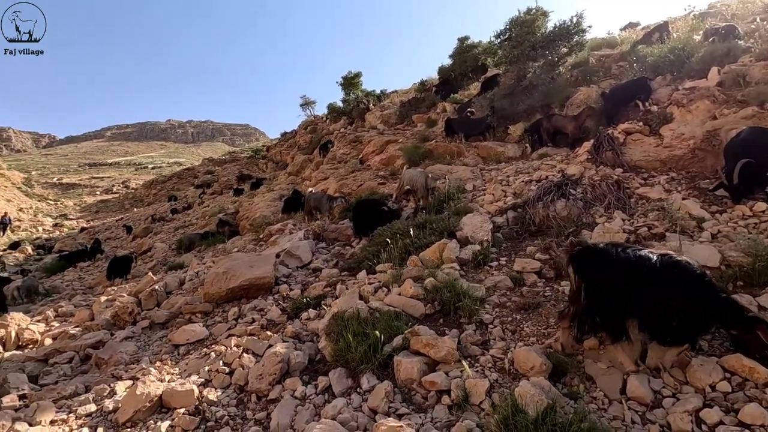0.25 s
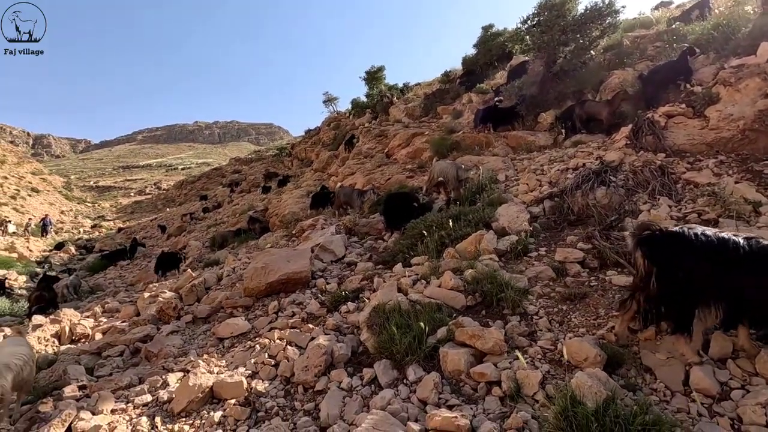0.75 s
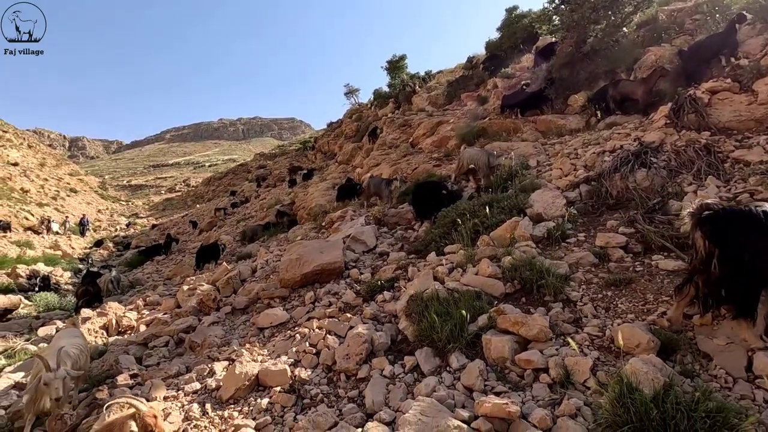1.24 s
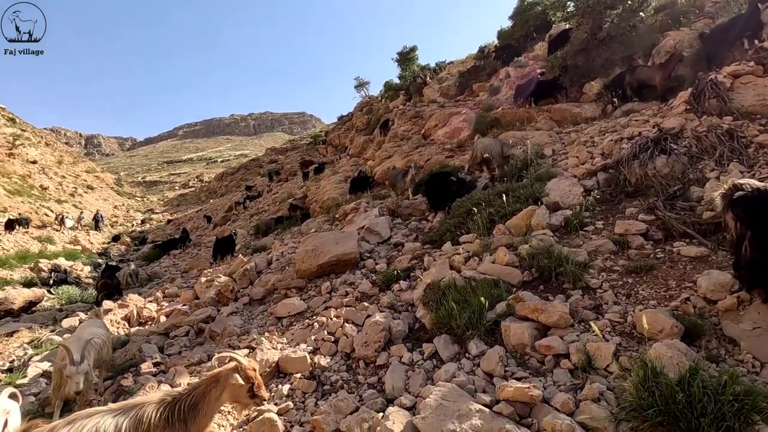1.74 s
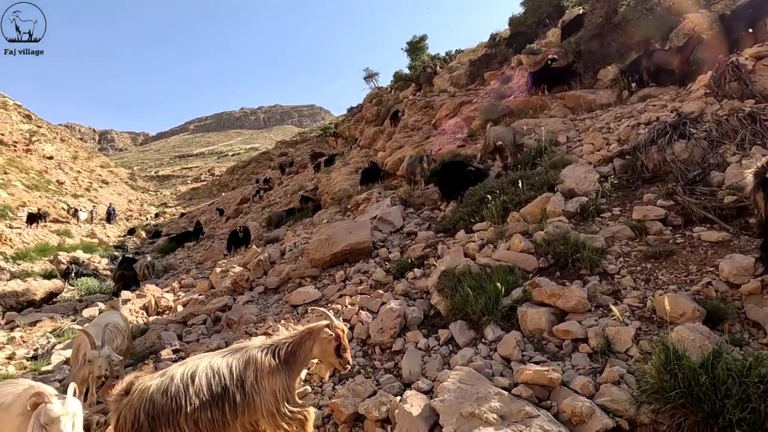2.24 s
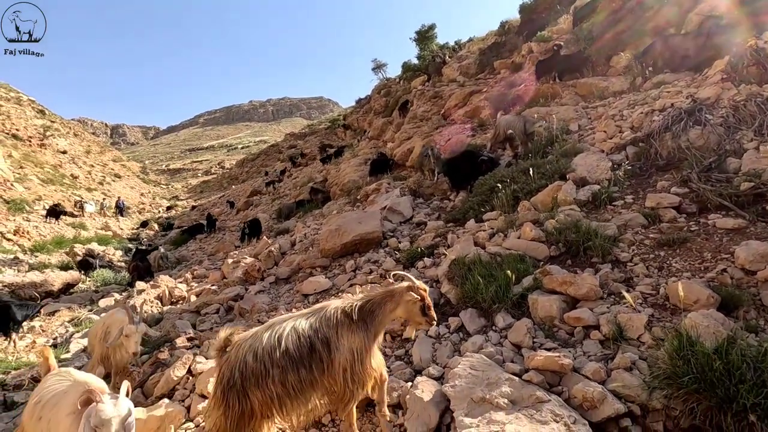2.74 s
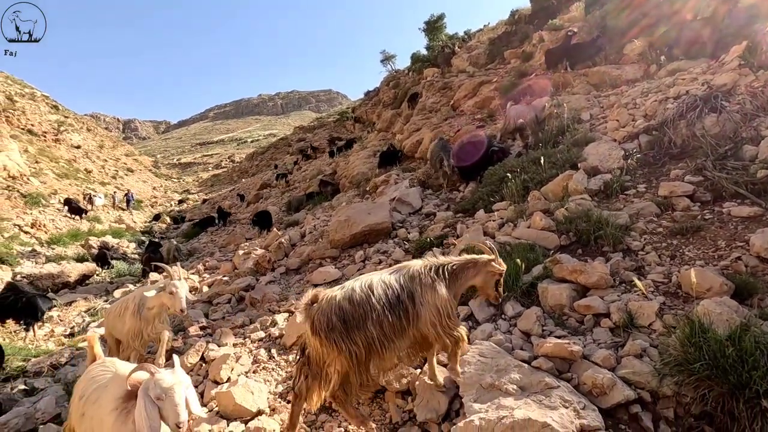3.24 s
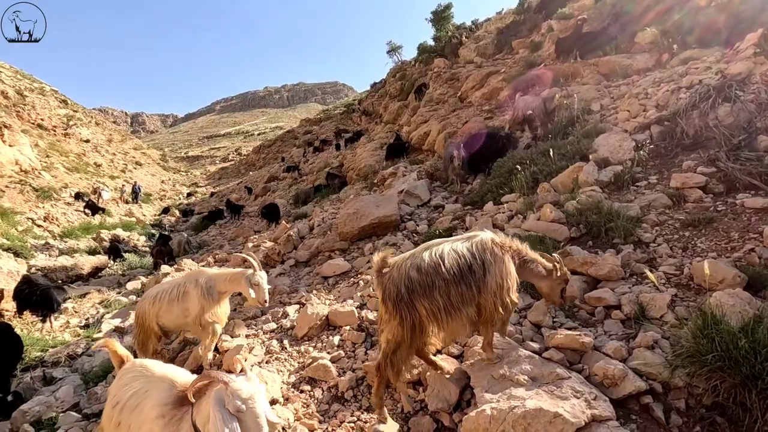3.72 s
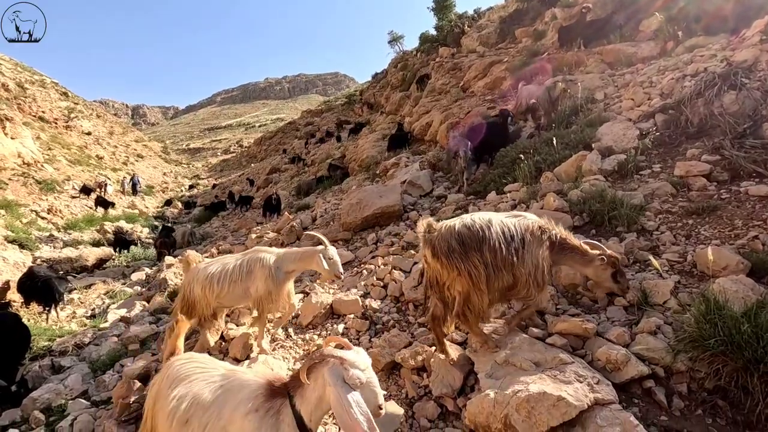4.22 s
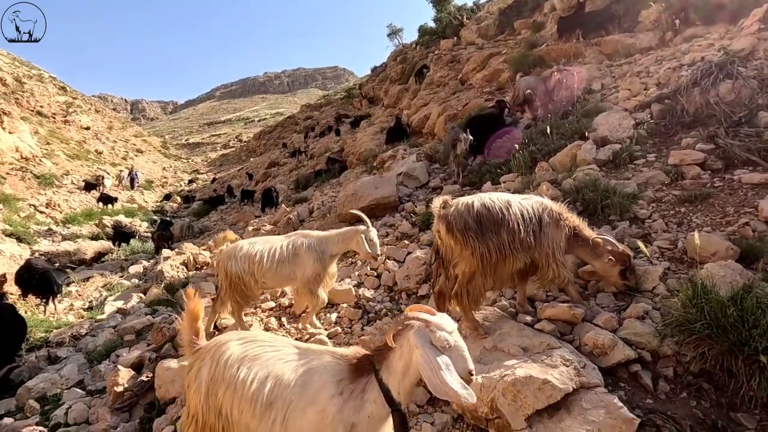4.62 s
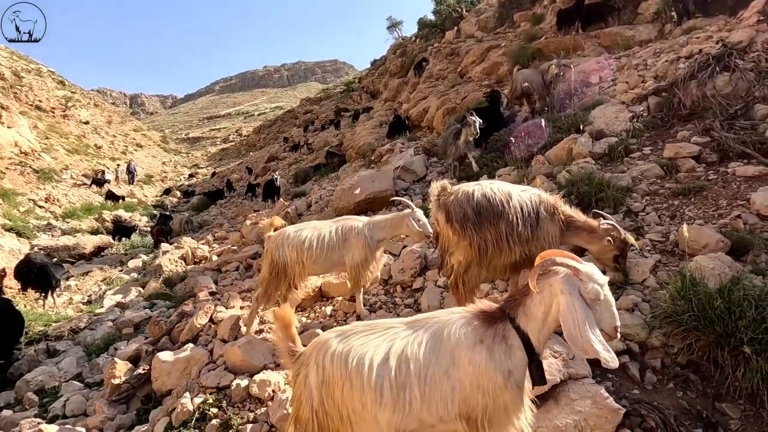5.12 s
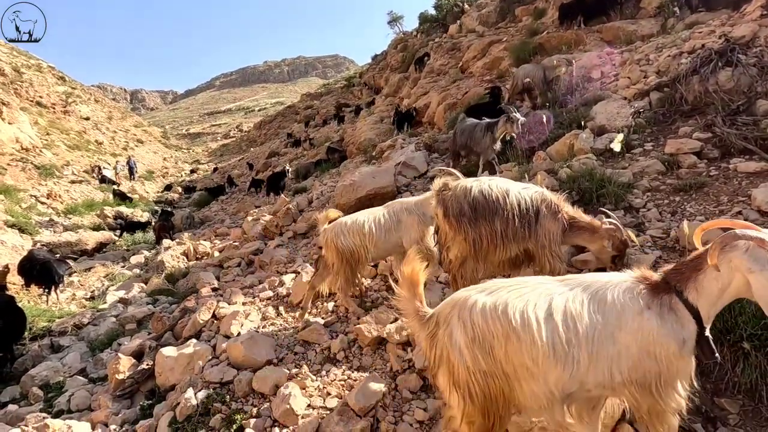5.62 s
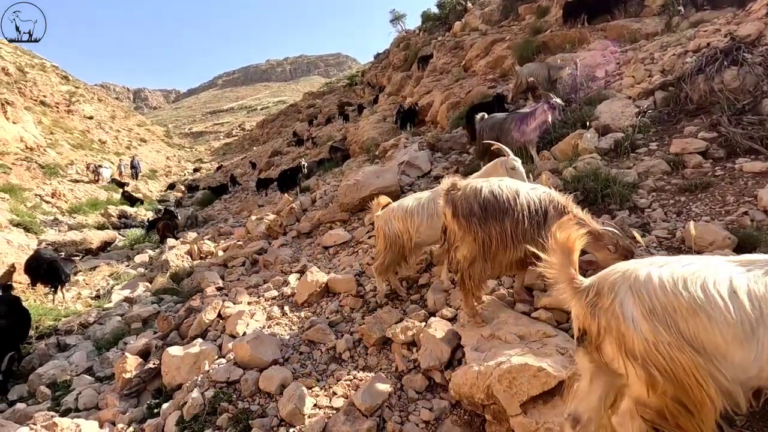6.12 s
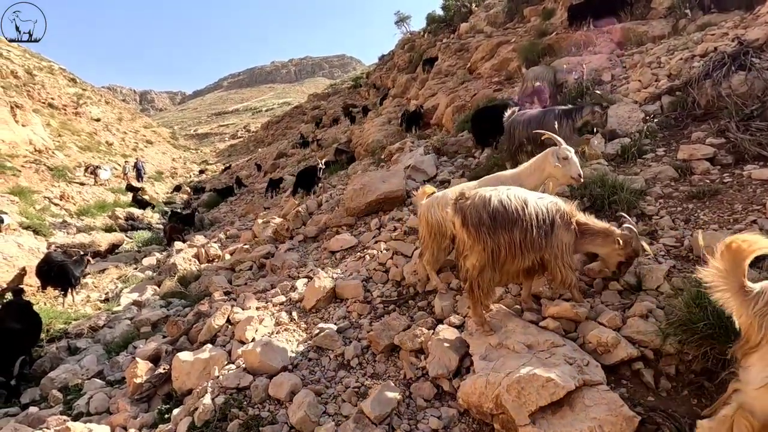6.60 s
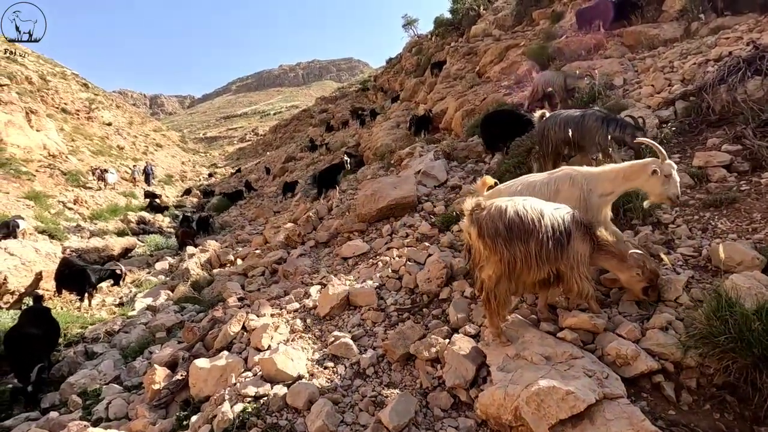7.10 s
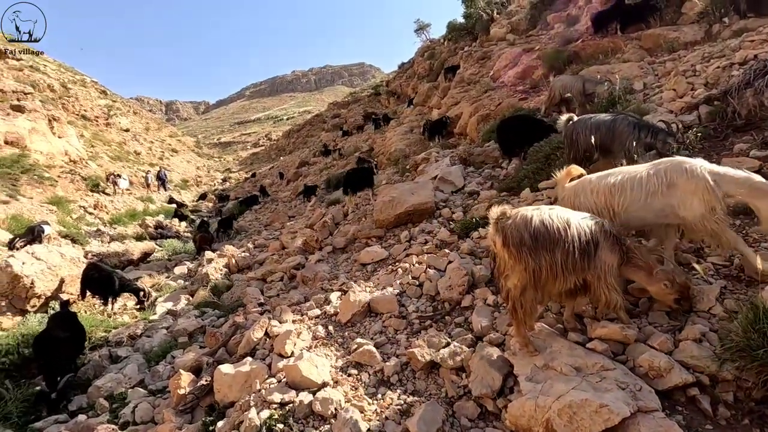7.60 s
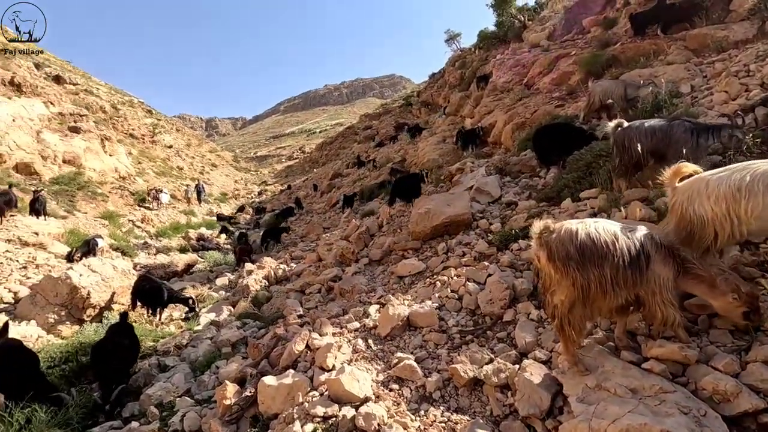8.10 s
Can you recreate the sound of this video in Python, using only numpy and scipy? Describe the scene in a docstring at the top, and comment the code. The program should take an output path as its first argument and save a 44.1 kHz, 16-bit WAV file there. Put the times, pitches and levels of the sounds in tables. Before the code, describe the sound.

Outdoors on a stony hillside, a goat's small metal bell is heard from the start, quiet and loosely spaced, with a very faint far bleat at 0.3 s and light stone clicks. Around 1 s a short low puff of wind thumps the microphone, stronger on the right. From 1.2 to 3 s the bell's clinks quicken and grow; a hollow stone knock lands at 2.1 s. From 3.5 s the bell is close, bright and ringing, irregular touches several times a second, drifting rightward. Low brief grunts come at 3.2, 5.5 and, most clearly, 6.3 s. Hooves knock stones and grind gravel throughout, with a crisp gritty scuff at 6 s. The bell has a rounder hum around 7 s; a distant wavering bleat comes at 7.7 s, then stone knocks and scuffs near 7.9 s. Clinking continues to the end at 8.35 s, with faint short rock echoes.

```python
"""A goat's small metal bell clinks as the animal walks past over loose stones on a hillside:
decaying modes, reset by each clapper touch. Hooves knock stones (struck noise bands) and grind
gravel (coloured noise grains). Goats grunt low and one bleats far off (harmonic stacks); a puff
of wind hits the microphone ports early on (low noise and pressure pulses). Rocks echo the near sounds.
"""
import sys
import numpy as np
from scipy import signal
from scipy.fft import rfft, irfft
from scipy.io import wavfile
from scipy.ndimage import uniform_filter1d

SR = 44100
rng = np.random.default_rng(int(sys.argv[2]) if len(sys.argv) > 2 else 0)


def persist_wave(psi):
    """Save psi, clipped to +-1, as 16-bit WAV."""
    counts = np.round(np.clip(psi, -1, 1) * 32767).astype(np.int16)
    wavfile.write(sys.argv[1], SR, np.atleast_2d(counts).T)


N = 368235


def gain_of(db):
    """Decibels to gain."""
    return 10 ** (np.asarray(db) / 20)


def evened(x):
    """Scales to rms 1."""
    return x / np.sqrt(np.mean(x ** 2) + 1e-20)


def read(points, hz, column=1):
    """A table column, interpolated on a log-frequency axis."""
    table = np.transpose(points)
    return np.interp(np.log(hz + 1), np.log(table[0] + 1), table[column])


def curve(rows, column=1):
    """A table column, interpolated at every sample."""
    table = np.transpose(rows)
    return np.interp(np.arange(N) / SR, table[0], table[column])


def held(rows):
    """For every sample, the index of the last event and the seconds since it."""
    start_s, t = np.transpose(rows)[0], np.arange(N) / SR
    last = np.maximum(np.searchsorted(start_s, t) - 1, 0)
    return last, t - start_s[last]


def add(mix, start_s, sound):
    """Mixes a sound in at start_s."""
    part = mix[:, round(start_s * SR):][:, :sound.shape[-1]]
    part += sound[..., :part.shape[-1]]


def drift(top_hz):
    """Slow random wander of rms 1: 16 sines over the decade below top_hz."""
    t = np.arange(N // 64 + 2) * 64 / SR
    slow = 0
    for f in np.geomspace(top_hz / 10, top_hz, 16):
        slow = slow + np.sin(2 * np.pi * (f * t + rng.random())) / np.sqrt(f)
    return np.interp(np.arange(N) / SR, t, evened(slow - slow.mean()))


def band(x, lo_hz, hi_hz):
    """Band-pass."""
    return signal.sosfilt(signal.butter(2, [lo_hz, hi_hz], "bandpass", fs=SR, output="sos"), x)


# left-right likeness of the ground noise: f/Hz, likeness/1
LIKENESS = [(60, 0.83), (180, 0.9), (540, 0.75), (1640, 0.7), (4940, 0.73), (14900, 1)]


def coloured(x, shape):
    """Gives two channels a spectrum and a partial likeness, rms 1."""
    hz = np.fft.rfftfreq(N, 1 / SR)
    a, b = rfft(x) * gain_of(read(shape, hz))
    same = np.clip(read(LIKENESS, hz), -1, 1)
    return evened(irfft([a, same * a + np.sqrt(1 - same ** 2) * b], N))


# slow pressure lumps: t/s, level/dB
WIND_LEVEL = [(0.0, -56), (0.23, -65.5), (1.0, -36.5), (1.39, -54.5), (1.46, -41.5), (1.53, -53.5),
              (3.16, -76), (3.46, -51.5), (3.56, -62), (5.86, -67.5), (6.05, -63), (6.6, -68), (7.91, -52),
              (8.02, -65), (8.35, -49)]
# faster buffeting of one gust, before gust_db: t/s, level/dB
GUST_LEVEL = [(0.4, -96), (0.964, -39), (1.546, -62.5), (1.6, -83)]
# sharpest pushes of the gust, before the port tilt: t/s, peak/dB, half-width/s
PUSHES = [(0.943, -29, 0.0032), (0.981, -23.5, .003), (0.994, -26, 0.0028), (1.019, -27, 0.0017)]


def wind(lumps_db=1.5, right_db=5.0, gust_db=-6.0):
    """Slow pressure lumps on both ports, stronger on the right, and one gust with sharp pushes."""
    t = np.arange(N) / SR
    a, b, c = rng.standard_normal((3, N))
    ports = np.array([a + 0.35 * b, a - 0.24 * b])
    lumps = evened(band(band(ports, 6.5, 32.5), 5.2, 140.0)) * gain_of(curve(WIND_LEVEL))
    blowing = (t > GUST_LEVEL[0][0]) * (t < GUST_LEVEL[-1][0])
    gust = evened(band(c, 75.0, 136.0)) * gain_of(curve(GUST_LEVEL) + gust_db) * blowing
    pushes = 0
    for s, db, half_width_s in PUSHES:
        u2 = ((t - s) / half_width_s) ** 2 / 2
        pushes = pushes + gain_of(db) * (1 - u2) * np.exp(-u2)
    mix = (lumps + gust) * gain_of(lumps_db * drift(25.)) + pushes
    return mix * gain_of([[-right_db / 2], [right_db / 2]])


def voices(calls, tone_db, order, rough_db):
    """Short harmonic calls of uneven level; a call's pitch column follows harmonic number order."""
    out = np.zeros((2, N))
    for rows in calls:
        s, hz, db = np.transpose(rows)
        t = np.arange(s[0], s[-1], 1 / SR)
        phase = 2 * np.pi * np.cumsum(np.interp(t, s, hz) / order) / SR
        stack = sum(gain_of(d) * np.sin((k + 1) * phase) for k, d in enumerate(tone_db))
        level = np.sqrt(2) * gain_of(np.interp(t, s, db))
        roughness = gain_of(rough_db * drift(61.0)[:len(t)])
        add(out, s[0], level * stack * roughness * signal.windows.tukey(len(t), .3))
    return out


# one table a far bleat: t/s, f of 2nd harmonic/Hz, level/dB
BLEAT_TRACKS = [
    [(0.28, 640, -78), (0.298, 606, -57), (0.346, 562, -75), (0.376, 587.6, -87), (0.4, 570, -91)],
    [(7.69, 603, -67), (7.732, 590, -47.5), (7.758, 575, -66), (7.796, 630.1, -52), (7.95, 627, -57)],
]
# per harmonic: relative level/dB
BLEAT_HARMONICS = [-54, -4.5, -13, -17]


def bleats():
    """Far bleats: voiced harmonics, the second strongest, on a wavering pitch."""
    return voices(BLEAT_TRACKS, BLEAT_HARMONICS, order=2, rough_db=1.0)


# low grunts: t/s, length/s, first f/Hz, mid level before the port tilt/dB
GRUNT_CALLS = [(3.162, 0.16, 110, -49.5), (5.514, .14, 113.8, -53.5), (6.345, 0.14, 103.7, -43)]
# per harmonic: relative level/dB
GRUNT_HARMONICS = [0, -9.5, -28, -25]


def grunts(sag_hz_per_s=175, ends_db=-7, right_db=3.0):
    """Low voiced harmonics; pitch sags steadily while the level arches, stronger on the right."""
    u = np.linspace(0, 1, 9)
    calls = []
    for s, length_s, hz, db in GRUNT_CALLS:
        arch_db = db + ends_db * (2 * u - 1) ** 2
        calls.append(np.transpose([s + u * length_s, hz - sag_hz_per_s * u * length_s, arch_db]))
    tilt = gain_of([[-right_db / 2], [right_db / 2]])
    return voices(calls, GRUNT_HARMONICS, order=1, rough_db=2.5) * tilt


# ground noise, before grit_db and earth_db: t/s, grit level/dB, earthy scrape level/dB
SHUFFLE_LEVEL = [(0.0, -66.5, -70.5), (2.93, -62.5, -64.5), (3.28, -59.5, -56), (3.58, -63, -74),
                 (3.81, -58.5, -65), (5.95, -58.5, -62.5), (7.42, -64, -67.5), (7.95, -59.5, -64),
                 (8.07, -58.5, -71), (8.35, -60, -66.5)]
# hooves dragging through gravel: t/s, length/s, added grit level/dB
SCUFF_EVENTS = [(3.165, 0.15, -53), (4.028, 0.05, -48), (5.673, 0.037, -56), (5.987, 0.021, -34.5),
                (6.083, 0.061, -45.5), (6.323, .12, -59.5), (7.474, 0.069, -47), (7.895, 0.1, -45.5)]
# gravel spectrum: f/Hz, relative level/dB
GRIT_SHAPE = [(600, 0), (1600, 11), (3400, 3.5), (5700, 6.5), (7400, 10.5), (9000, -24), (12400, -50),
              (15300, -61)]
# earth spectrum: f/Hz, relative level/dB
EARTH_SHAPE = [(90, -5), (130, 3.5), (180, 8), (400, -2), (900, -15), (1500, -23.5)]


def shuffle(grains_per_s=600, spread_db=4.5, hiss=0.16, grit_db=4.5, earth_db=3.5):
    """The herd's many small steps: gravel grains in three bands over a far hiss, scuffs, an earthy scrape."""
    grit = 0
    for lo_hz, hi_hz in [(300, 2200), (2200, 4500), (4500, 15000)]:
        size = gain_of(spread_db * np.minimum(rng.exponential(1, N), 4))
        hits = size * (rng.random(N) < grains_per_s / SR)
        grains = signal.oaconvolve(hits, np.exp(-np.arange(600) / 190.0))[:N]
        patches = gain_of(1.5 * drift(15.))
        grit = grit + band((hiss + evened(grains)) * patches * rng.standard_normal((2, N)), lo_hz, hi_hz)
    level = gain_of(curve(SHUFFLE_LEVEL) + grit_db)[None]
    for s, length_s, db in SCUFF_EVENTS:
        add(level, s, gain_of(db) * signal.windows.tukey(round(length_s * SR), .6))
    earth = coloured(rng.standard_normal((2, N)) * gain_of(5.5 * drift(30.)), EARTH_SHAPE)
    earth_level = gain_of(curve(SHUFFLE_LEVEL, column=2) + earth_db)
    return coloured(grit, GRIT_SHAPE) * level + earth * earth_level


# stones knocked by hooves, levels before peak_db: t/s, knock/dB, knock f/Hz, ground thump/dB, grit/dB
STONE_HITS = [(0.2454, -41, 2330, -71, -48), (0.2505, -49, 2240, -73.5, -60),
              (0.277, -50, 1520, -65, -35.5), (0.4228, -44, 2100, -77, -63), (0.821, -48.5, 3200, -67, -40),
              (1.4272, -57, 2120, -59, -45), (1.6227, -73, 1840, -58, -67), (1.676, -52, 1750, -61, -60),
              (1.717, -43.5, 3160, -60.5, -32), (1.834, -45, 3120, -67, -41), (1.98, -53, 2000, -61, -66),
              (2.0844, -31.5, 1037, -42, -61), (2.2284, -56, 2240, -70, -36.5),
              (2.437, -67, 1860, -49, -44), (3.0898, -37.5, 3220, -59, -39),
              (3.8516, -43.5, 2980, -67, -47), (4.0164, -53, 3200, -81, -46),
              (4.451, -45.5, 1890, -61, -44), (4.805, -44, 2800, -55, -60), (4.8723, -57.5, 940, -55, -34),
              (5.149, -52.5, 2220, -72, -41), (5.3528, -41, 1740, -49, -38), (5.455, -44.5, 930, -59, -60),
              (5.475, -49, 1920, -47, -44), (5.8677, -49, 1690, -67, -55), (5.9555, -58, 1570, -60, -38),
              (5.997, -40, 1730, -52, -25), (6.1258, -41, 2500, -51, -26.5), (6.1694, -47, 2810, -62, -43),
              (6.9604, -39, 1380, -54.5, -62), (7.0752, -40, 1450, -53.5, -48),
              (7.6659, -54, 1610, -48.5, -50), (7.9319, -48, 2880, -50, -45), (7.9675, -39, 1010, -40, -42),
              (8.112, -48, 2300, -69, -42)]
# the goat's way past: t/s, side/1 (0 left, 1 right, beyond 1 further right)
SIDE = [(0, 0.), (1, 0.), (3, 0.12), (5, 1.16), (6.3, 1.25), (7.3, 1.47), (8.35, 0.48)]


def stones(knock_s=0.0055, thump_s=0.012, grit_s=0.0087, tail_db=-18, tail_s=0.025, snap=14.7,
           width=0.14, overtone=1.62, overtone_db=-7.5, thump_hz=495, peak_db=8.5):
    """A short knock at the stone's two pitches, a thump of the ground, a spit of grit, and a noise tail."""
    out, t = np.zeros(N)[None], np.arange(4000) / SR
    for s, knock_db, knock_hz, thump_db, grit_db in STONE_HITS:
        lo_hz, hi_hz = (1 - width) * knock_hz, (1 + width) * knock_hz
        parts = [(knock_db, lo_hz, hi_hz, knock_s),
                 (knock_db + overtone_db, overtone * lo_hz, overtone * hi_hz, knock_s),
                 (thump_db, 0.5 * thump_hz, 1.75 * thump_hz, thump_s),
                 (grit_db, 3600, 6800, grit_s)]
        for db, lo_hz, hi_hz, fade_s in parts:
            struck = rng.standard_normal(len(t)) + snap * (t == 0)
            fade = np.exp(-t / fade_s) + gain_of(tail_db) * np.exp(-t / tail_s)
            part = band(struck * fade, lo_hz, hi_hz)
            add(out, s, gain_of(db + peak_db) * part / abs(part).max())
    pan_db = 1.5 - 3.8 * curve(SIDE)
    return out * gain_of([pan_db / 2, -pan_db / 2])


# bell modes: f/Hz, before the shift of coming and going
MODE_HZ = [1252, 3698, 3827, 6520, 6646, 7053, 7262, 8138, 8405, 8841, 9976, 10425, 11805, 12200, 12440,
           12800, 13571, 14023, 14664, 11660, 11980, 12855, 14200]
# coming, then going, shifts all modes alike: t/s, f of upper bright mode/Hz
SHIFT = [(0, 7268), (3.5, 7268), (4.6, 7260), (6.1, 7247), (8.35, 7247)]


def pitch_ratio():
    """Pitch of the passing bell against its mode table."""
    return curve(SHIFT) / MODE_HZ[6]


# touches that set the hum's faint partner: t/s, level/dB
PARTNER_TOUCHES = [(0, -73.5), (.262, -60.5), (.75, -65), (1.215, -71), (1.631, -61), (2.001, -75),
                   (2.18, -59), (2.68, -68), (3.098, -56), (3.326, -61), (3.515, -59), (3.831, -63),
                   (4.172, -51), (4.845, -59), (5.209, -52.5), (5.792, -54), (5.915, -50), (6.066, -72),
                   (6.384, -60), (7.327, -64), (7.781, -54), (8.047, -56)]


def partner(hz=1414, t60_s=8.6, wander_hz=1.3):
    """A faint mode above the hum, ringing long between the touches that set it."""
    last, since_s = held(PARTNER_TOUCHES)
    level_db = np.transpose(PARTNER_TOUCHES)[1][last] - 60 * since_s / t60_s
    level = uniform_filter1d(gain_of(level_db), 200)
    return level * np.sin(2 * np.pi * np.cumsum(hz * pitch_ratio() + wander_hz * drift(2.4)) / SR)


# clapper touches: t/s, hum level/dB, hardness (bright pair over hum)/dB, bright pair's upper share/1,
# low pair over hum/dB, low pair's upper share/1
TOUCHES = [(0.0, -41, -6.5, 0.4, -17.5, 0.5), (0.156, -45.5, 0, 0.8, -19, 0.36),
           (0.26, -41.5, 1, 0.73, -11.5, 0.7), (0.34, -43, 3.3, 0.4, -20, 0.7),
           (0.516, -50, 6.6, 0.44, -11.8, 0.7), (0.654, -33, 0, 0.07, -23, 0.6),
           (0.84, -64, 37.5, 0.73, 16, 0.7), (0.854, -36.5, -0.5, 0.78, -14, 0.28),
           (1.058, -35, -0.2, 0.28, -20, 0.2), (1.213, -36, -9.0, 1, -29, 0.9),
           (1.269, -29.5, -11, 0.6, -24, 0.81), (1.288, -42.5, 2, 0.46, -18.2, 0.9),
           (1.345, -45.5, -2.5, 0.1, -14, 0.5), (1.415, -33, -7, 0.17, -23.5, 0),
           (1.631, -32.5, -4, 0.36, -15.5, 0.25), (1.675, -28.5, 4.5, 0.3, -13.5, 0.79),
           (1.712, -52, 8, 0.5, -6, 0.8), (1.727, -38.5, 0.5, 0.3, -9, 0.24),
           (1.836, -27.5, -2, 0.65, -17.5, 0.45), (1.868, -30.5, -1.5, 0.4, -20, 0.52),
           (2.001, -31, -11, 0.8, -21.1, 0.2), (2.077, -46.5, 3.3, 0.8, -13, 0.42),
           (2.178, -31.8, -7, 0.85, -21.5, 0.4), (2.23, -37, -0.5, 0.54, -20.9, 0.4),
           (2.357, -34.5, 10.5, 0.37, -10, 0.7), (2.407, -34, -5, 0.26, -16, 0.82),
           (2.503, -36.2, -3, 0.97, -21, 0.6), (2.543, -27, -4, 0.74, -19.5, 0.9),
           (2.588, -28.0, -9.5, 0.7, -27, 0.4), (2.679, -31, -14, 0.35, -21, 0.8),
           (2.846, -26.5, -3.5, 0.93, -15.5, 0.4), (3.098, -28, 7, 0.99, -15, 0.2),
           (3.145, -35, 9, 0.94, -5, 0.22), (3.26, -27.5, 2.7, 0.23, -13.5, 0.34),
           (3.325, -25, 2.5, 0.85, -11, 0.6), (3.389, -35, 8.5, 0.28, -6.5, 0.61),
           (3.457, -44.5, 5, 0.1, 1, 0.49), (3.513, -31, -4.5, 0.7, -7.5, 0.3),
           (3.534, -21, -9.5, 0.45, -21.2, 0), (3.654, -29, 5, 0, -12.5, 0.97),
           (3.68, -18, -2.5, 0.26, -20, 0.54), (3.741, -28.5, 3.5, 0.42, -18, 0.8),
           (3.783, -46.5, 7, 0.9, -5, 0.4), (3.83, -39.5, -2, 0.6, -19, 0),
           (3.895, -35, 11, 0.02, -13.5, 0.8), (4.172, -18, -1, 0.03, -16, 0.8),
           (4.192, -22.5, 4.5, 0.27, -12, 0.4), (4.339, -26, -1.5, 0.85, -11.5, 0.82),
           (4.423, -53, 20, 0.85, 12, 0.55), (4.554, -25.5, 6, 0, -8, 0.7),
           (4.568, -15.5, -5, 0.62, -13.5, 0.23), (4.698, -26, 8.5, 0.83, -9, 0.1),
           (4.845, -23, 8, 0.92, -13.5, 0.45), (4.941, -21, 2.5, 0.22, -20.5, 1),
           (4.985, -28.5, 1.5, 0.15, -15, 0.5), (5.179, -30.5, 3, 0.04, -7, 0.8),
           (5.209, -29.5, 10.5, 0.02, -4, 0.94), (5.255, -21.5, 5.5, 0.2, -9, 0.84),
           (5.331, -29.5, 4.6, 0.8, -8.5, 0.28), (5.488, -25.5, 10.5, 0, -6.5, 0.94),
           (5.596, -22.5, 4, 0.34, -8.5, 0.71), (5.669, -43.5, 14.5, 0.54, 6.5, 0.52),
           (5.792, -16, -6.5, 0.7, -11.5, 0.02), (5.885, -24.5, 6.5, 1, -6.5, 0.11),
           (5.914, -29, 9, 0.36, -11, 0.62), (6.015, -20, -8.6, 0.8, -18.5, 0.82),
           (6.067, -26.5, 1.2, 0.39, -11.2, 0.1), (6.121, -36, -1.5, 0.1, -5, 0),
           (6.206, -23, -5, 0.42, -18, 0.3), (6.384, -33, 8, 0.03, -6.5, 0.95),
           (6.562, -25, 3.5, 0.86, -11, 0.12), (6.702, -22.5, -2.5, 0, -17, 0.58),
           (6.732, -30, 7.9, 0.67, -9, 0.23), (6.804, -31, -5.5, 0.5, -26, 1),
           (6.842, -21.5, -7, 0.7, -19.5, 0.21), (6.898, -46.5, 14.1, 0.36, 3, 0.2),
           (6.921, -36.5, 4.5, 0.3, -10.5, 0.2), (7.049, -17.5, -7, 0.83, -26.5, 0.68),
           (7.195, -14.5, -15, 0.55, -22.5, 0.098), (7.327, -25.5, -0.5, 0.8, -15, 0.04),
           (7.492, -25, -2, 0.86, -18.5, 0.07), (7.643, -27.2, -7.5, 0.56, -21.5, 0.12),
           (7.685, -35, 4, 0.86, -15, 0.44), (7.78, -21.5, -1.5, 0, -23, 0.63),
           (7.845, -29.5, -3, 0.24, -12.5, 0.94), (7.918, -21.5, -3.5, 0.6, -16, 0.84),
           (7.963, -23, -8.5, 0.29, -21, 0.23), (8.046, -28.5, -2.5, 0.9, -12.5, 0.07),
           (8.069, -27, -8, 0.48, -17.5, 0.1), (8.151, -23.5, -4, 0.85, -19.3, 0.05),
           (8.181, -37, 10.5, 1, -7, 0.27), (8.282, -26, -3, 0.94, -12, 0.7),
           (8.299, -28, 1.5, 0.65, -12, 0.1)]
# per mode: level over hum/dB, t60/s before the 3800/f cap
MODES = [(0.0, 0.33), (1, 0.49), (0.5, 1), (-15, 0.75), (-19.5, 0.99), (1, 0.31), (-0.5, 0.37),
         (-21.5, 0.14), (-24.5, 0.55), (-31, 0.062), (-29, 0.25), (-31, 0.09), (-46.5, 0.16), (-50, 0.6),
         (-49, 0.044), (-32.5, 0.14), (-72, 0.09), (-44, 0.12), (-62, 0.18), (-41, 0.12), (-33.5, 0.21),
         (-41.5, 0.11), (-49, 0.12)]
# per mode: family/1 (0 hum, 1 low pair, 2 quiet pair, 3 bright pair, 4 top modes)
MODE_FAMILY = [0, 1, 1, 2, 2, 3, 3] + [4] * 16
# per family: share of a touch's hardness taken up/1
HARDNESS_SHARE = [0.1, 0.078, 0.62, 1, 0.72]
# port responses: f/Hz, left source level/dB, phase/rad, right source level/dB, phase/rad (left re right)
PORT_DIFFERENCE = [(1252, 1.4, .08, -2.2, -.23), (3750, 2.6, -.11, -4.5, -.6), (6600, 1., .07, -.5, -.09),
                   (7150, 2.2, .2, .7, -.1), (8400, 6.8, .7, .8, -.5), (10200, 7., .8, 3.5, -.6),
                   (12400, 10., .5, 6., 2.2), (14200, 10., .3, 5.5, 1.2)]


def bell_ticks(tick_db=-7.5, fade_s=0.003):
    """The clapper ticks, a noise burst, by as much as it lifts the bright pair."""
    out = np.zeros((2, N))
    s, hum_db, hard_db = np.transpose(TOUCHES)[:3]
    ring = gain_of(hum_db + hard_db)
    left_over = ring[:-1] * gain_of(-60 * np.diff(s) / 0.024)
    for at, lift in zip(s[1:], np.maximum(ring[1:] - left_over, 0)):
        tick = rng.standard_normal(400) * np.exp(-np.arange(400) / (fade_s * SR))
        add(out, at, lift * gain_of(tick_db) * band(tick, 3120, 6300))
    return out


def bell(sway_db=2.0, hum_sway_db=1.9, sway_hz=14, rise_s=0.00037, hum_rise_s=0.002, swing=0.00068):
    """Each clapper touch sets or damps every mode afresh; the swinging bell turns its lobes, so modes waver."""
    s, hum_db, hard_db, bright, low_db, low = np.transpose(TOUCHES)
    out = bell_ticks()
    last, since_s = held(TOUCHES)
    turns = 2 * np.pi * np.cumsum(pitch_ratio() + swing * drift(7.3)) / SR  # swinging bends the pitch
    side, luck = curve(SIDE), rng.standard_normal((len(s), len(MODES), 2))
    # where the clapper lands splits each pair; the quiet pair's split is random
    angles = np.clip([low, rng.random(len(s)), bright], .01, .99) * np.pi / 2
    split = [np.ones(len(s))]
    for angle in angles:
        split += [np.cos(angle), np.sin(angle)]
    split += [np.ones(len(s))] * MODE_FAMILY.count(4)
    for k, (hz, (db, t60_s)) in enumerate(zip(MODE_HZ, MODES)):
        family = MODE_FAMILY[k]
        top = family == max(MODE_FAMILY)
        struck_db = hum_db + HARDNESS_SHARE[family] * hard_db + (family == 1) * low_db + db
        struck_db = struck_db + 5. * top * luck[:, k, 0]  # top modes are hit harder or softer by chance
        decay_db = -60 * since_s / min(t60_s, 3800.0 / hz)
        waver_db = (sway_db if k else hum_sway_db) * drift(sway_hz)
        # high modes have narrow lobes and flicker faster
        flicker_db = (2.1 * (k > 4) + 2.5 * (hz > 9500)) * drift(40. + 79.0 * top)
        level = (split[k] * gain_of(struck_db))[last] * gain_of(decay_db + waver_db + flicker_db)
        # the air in the bell's mouth takes up the hum slowly
        step = 1 / (1 + (rise_s if k else hum_rise_s) * SR)
        level = signal.lfilter([step ** 2], np.convolve([1, step - 1], [1, step - 1]), level)
        nudge = uniform_filter1d(np.cumsum(luck[:, k, 1])[last], 250)  # a touch also nudges the phase
        phase = hz * turns + nudge
        pan_db, lead = ((1 - side) * read(PORT_DIFFERENCE, hz, column=c)
                        + side * read(PORT_DIFFERENCE, hz, column=c + 2) for c in (1, 2))
        out += level * gain_of([pan_db / 2, -pan_db / 2]) * np.sin([phase + lead / 2, phase - lead / 2])
    return out


def slope(x, t60_s=0.24, apart=0.47):
    """Scattered echoes off the rocks, partly alike at both ports."""
    length = SR // 3
    slots = np.arange(200, length - 20, 20)
    at = slots + rng.integers(0, 20, (2, len(slots)))
    taps = np.zeros((2, length))
    np.put_along_axis(taps, at, rng.choice([-1., 1.], at.shape), 1)
    taps = np.array([taps[0] + apart * taps[1], taps[0] - apart * taps[1]])
    taps = taps * gain_of(-60 * np.arange(length) / SR / t60_s)
    return signal.fftconvolve(x, taps / np.linalg.norm(taps[0]), axes=1)[:, :N]


def scene():
    """Near sources with their echoes, over the herd and the wind."""
    background = wind() + bleats() + grunts() + shuffle()
    near = stones() + bell()
    echoes = gain_of(-19) * slope(near)
    return background + near + echoes + partner()


def record(dry, edge_hz=15450):
    """Low-pass band limit."""
    low_pass = signal.firwin(511, edge_hz, window=("kaiser", 9), fs=SR)
    return signal.oaconvolve(dry, low_pass[None], "same")


dry = scene()
out = record(dry)
persist_wave(out)
```